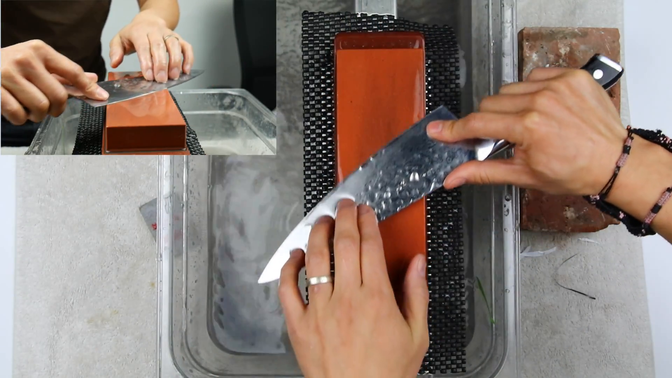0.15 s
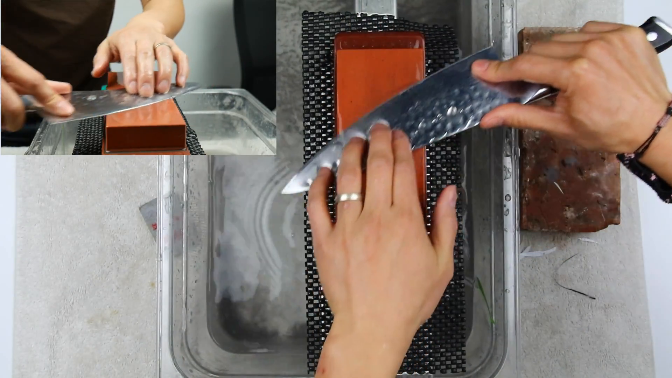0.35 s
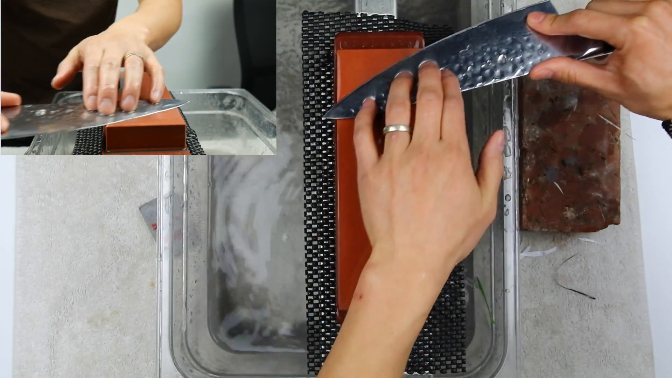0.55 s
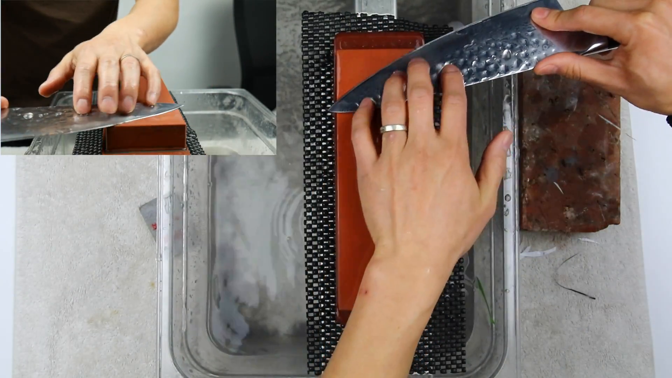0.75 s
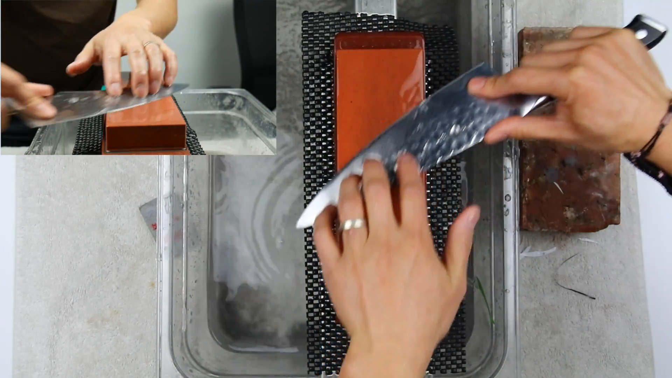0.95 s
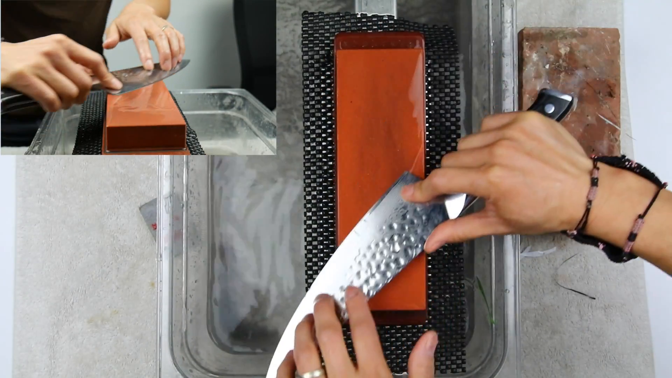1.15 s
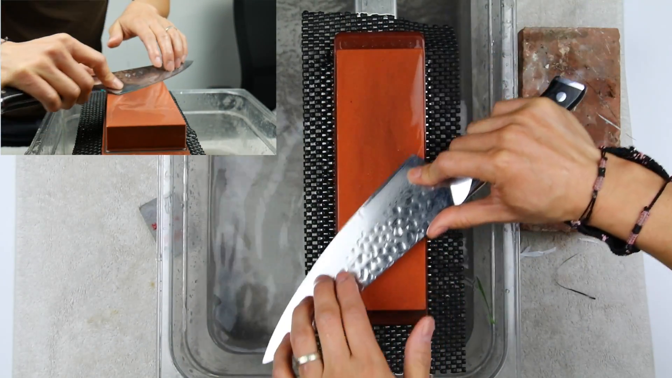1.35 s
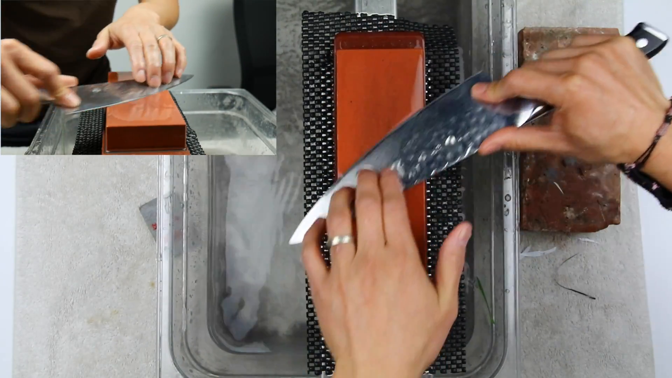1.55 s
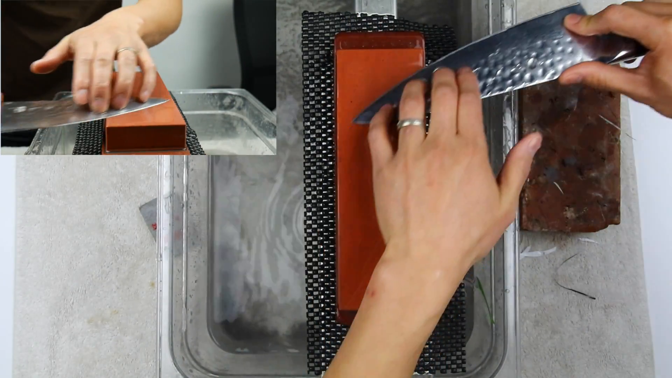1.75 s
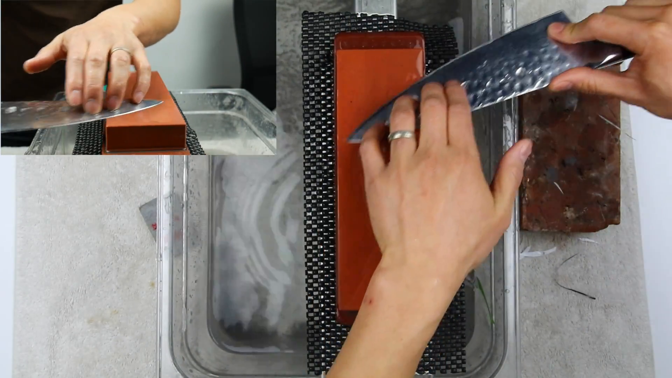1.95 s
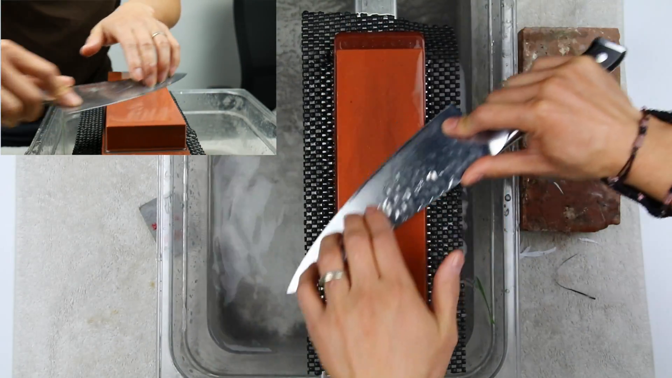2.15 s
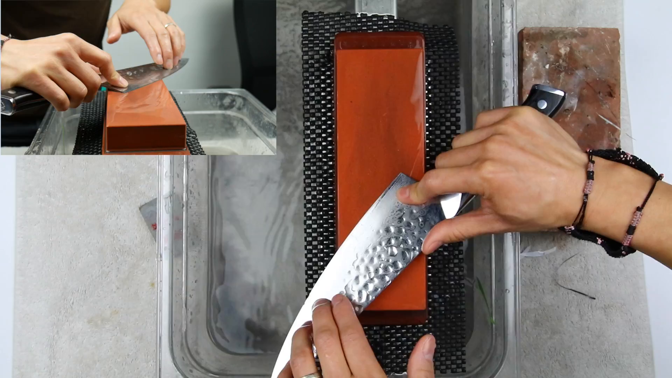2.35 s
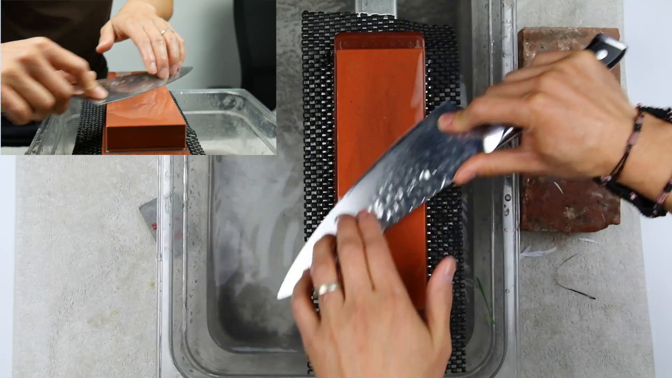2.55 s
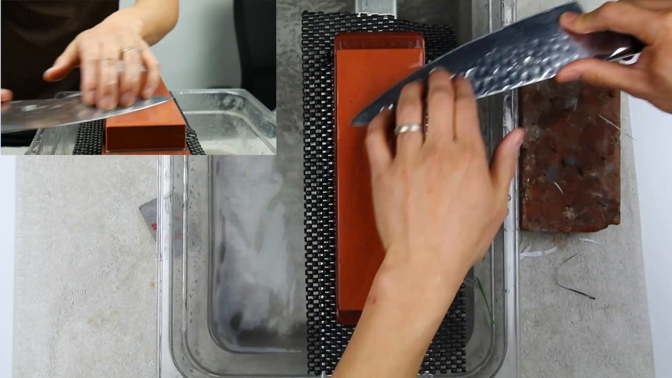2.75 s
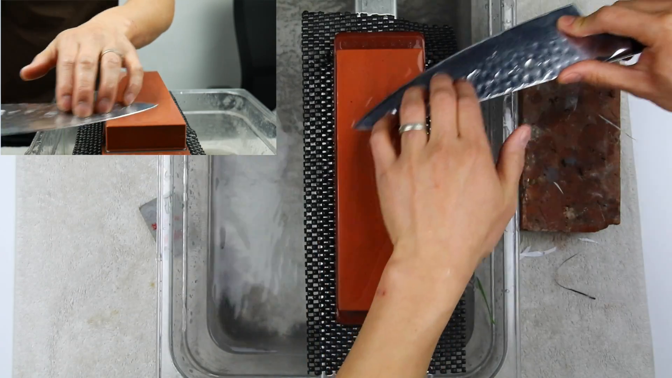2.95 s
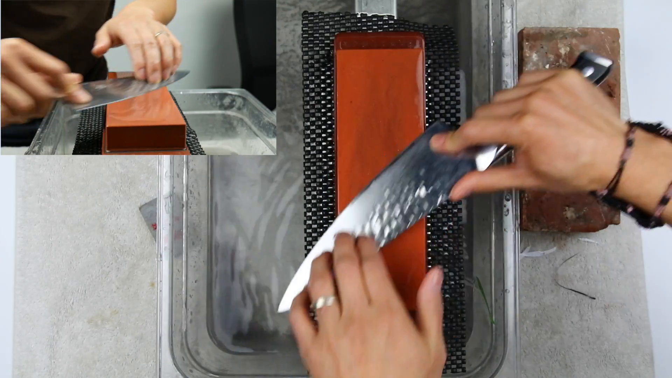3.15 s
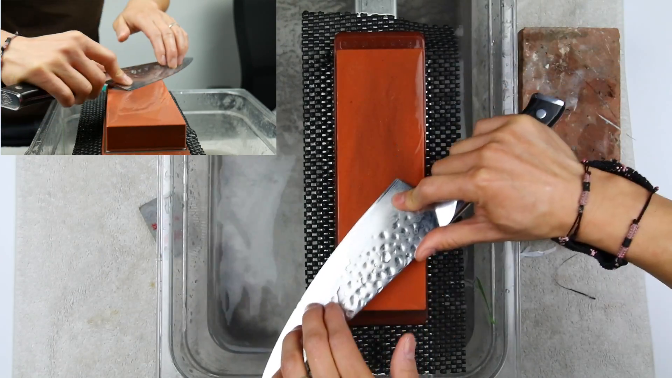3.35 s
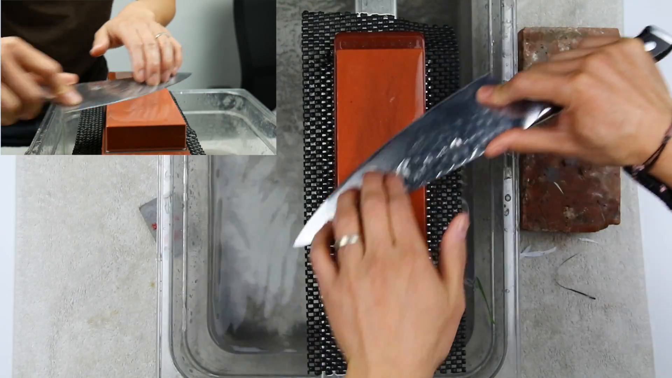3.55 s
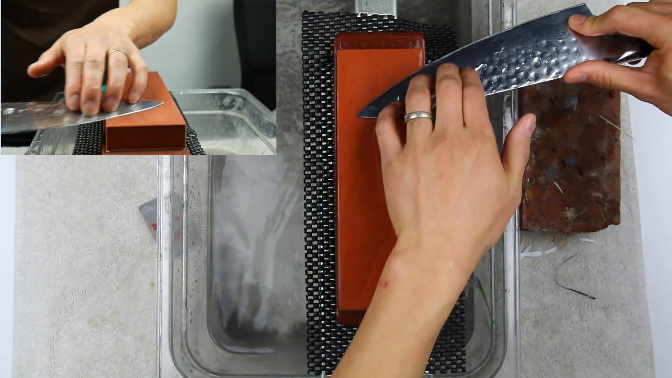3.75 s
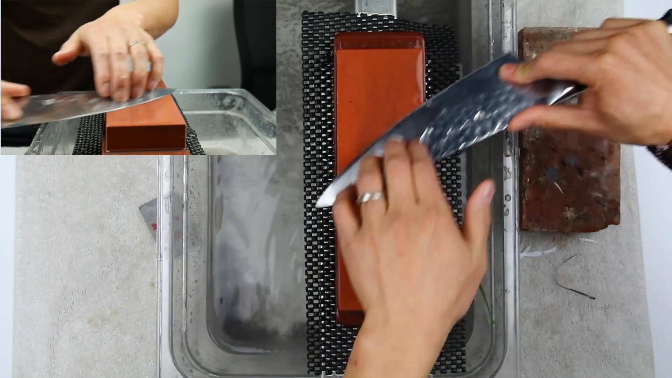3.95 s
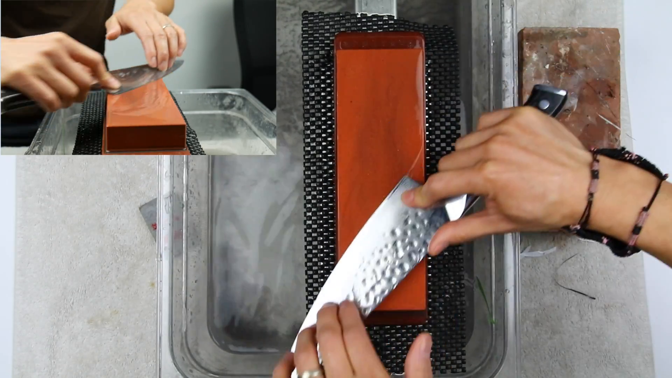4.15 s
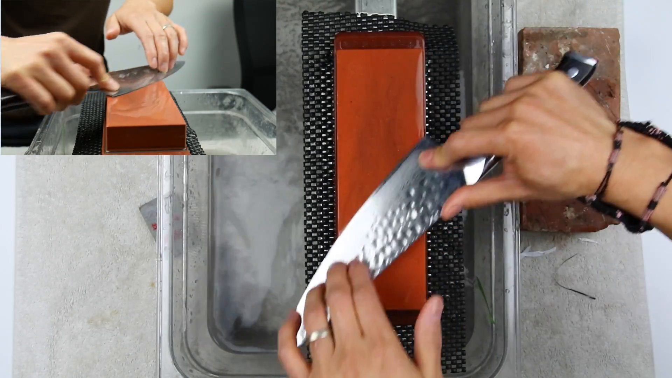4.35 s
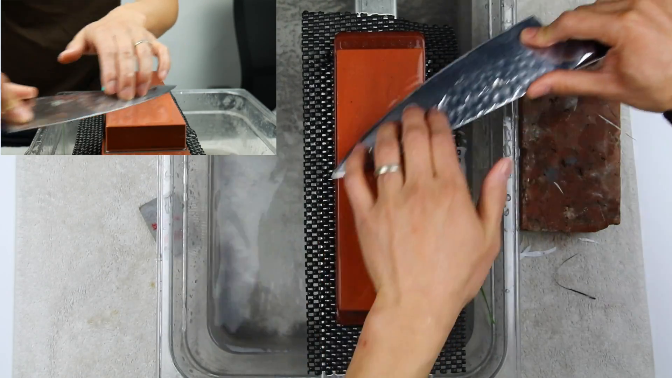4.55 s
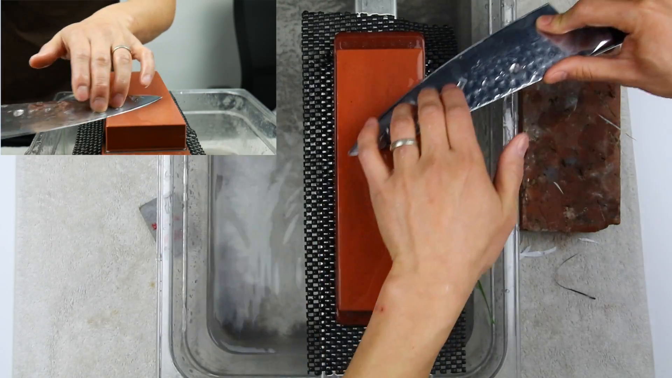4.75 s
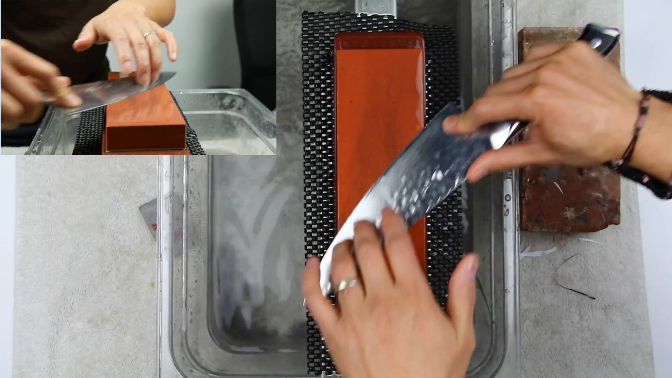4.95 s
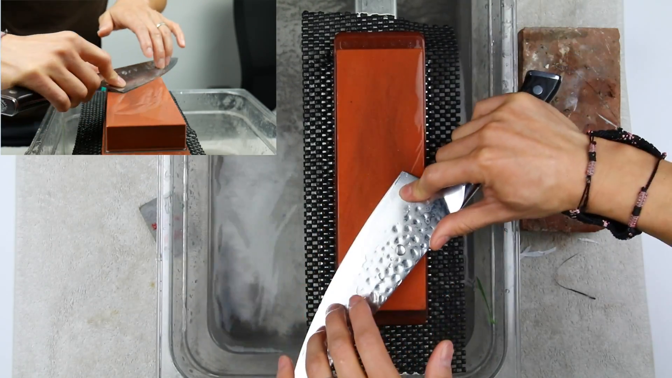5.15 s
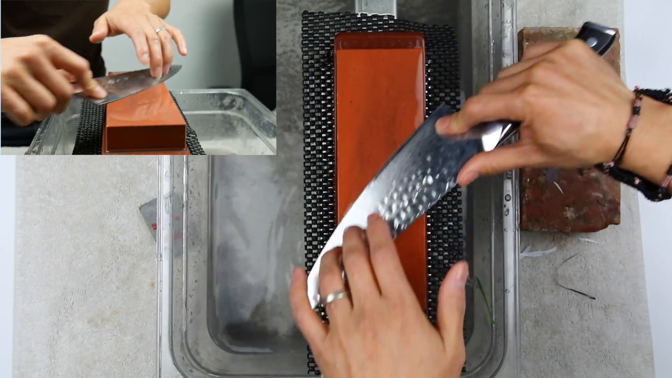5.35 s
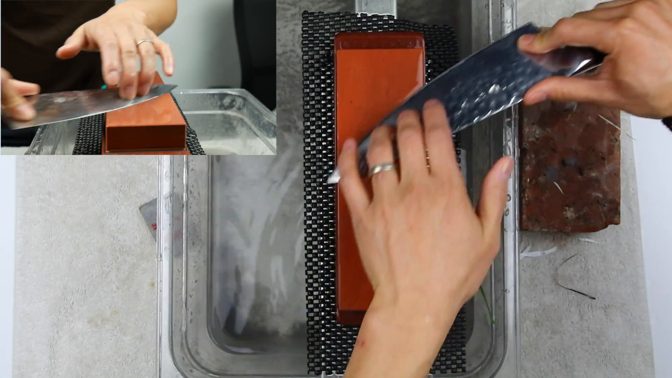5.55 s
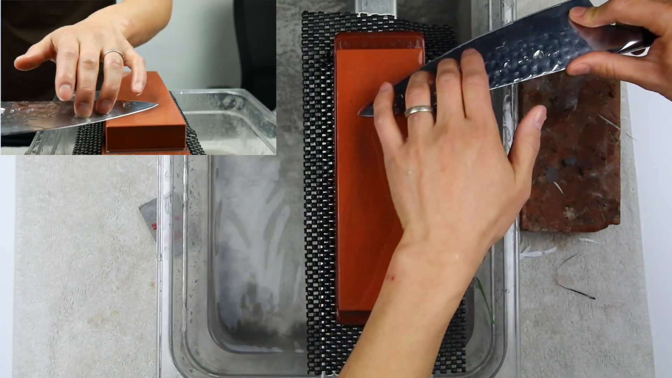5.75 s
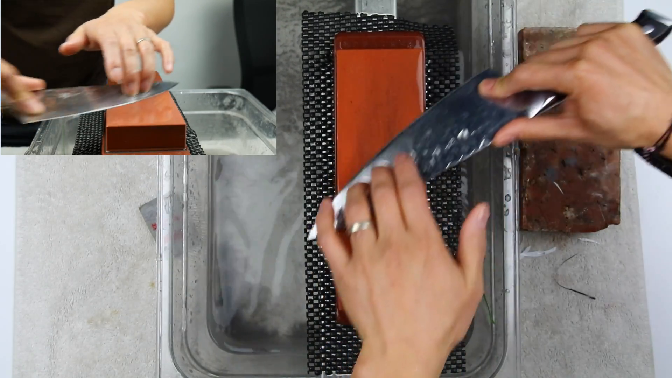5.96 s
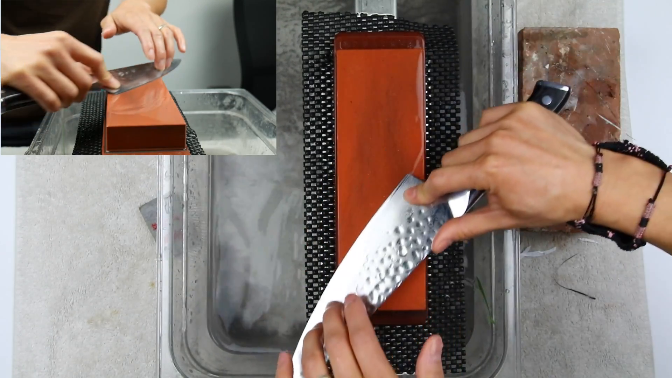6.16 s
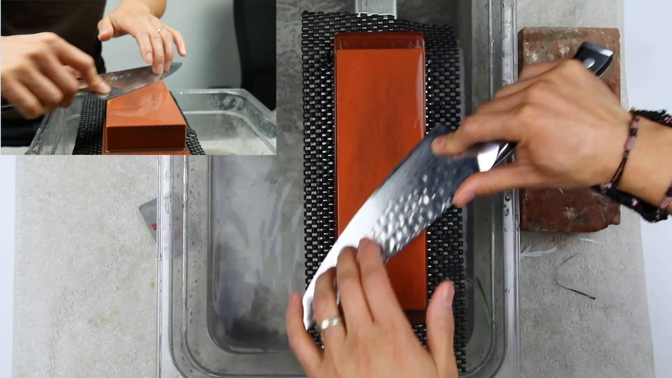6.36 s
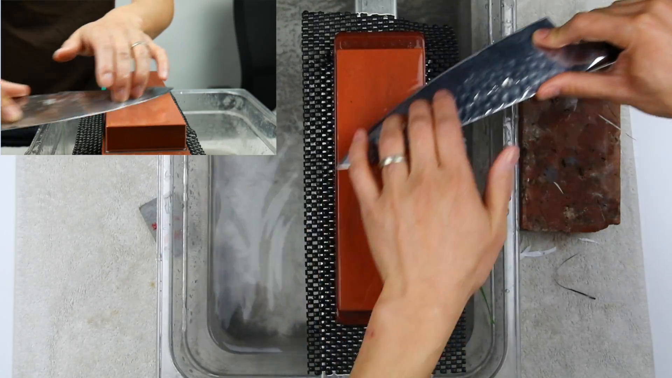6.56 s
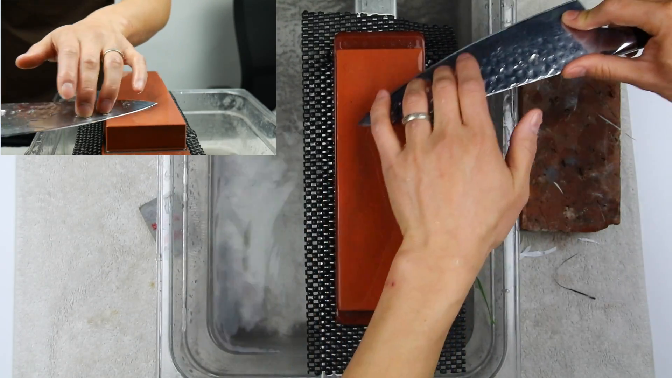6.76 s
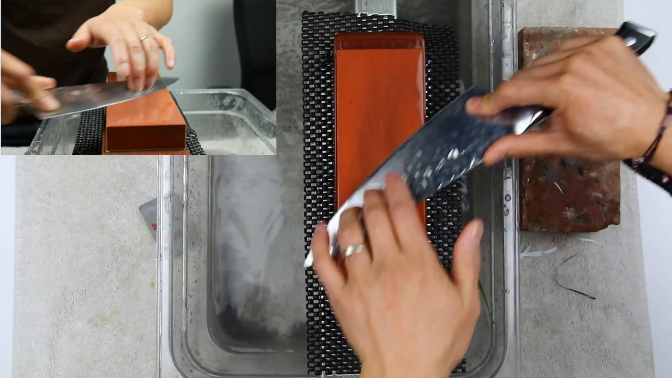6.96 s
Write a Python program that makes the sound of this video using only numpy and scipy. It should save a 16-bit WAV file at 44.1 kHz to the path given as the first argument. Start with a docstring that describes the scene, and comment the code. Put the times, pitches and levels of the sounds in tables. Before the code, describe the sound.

A close microphone in a quiet, faintly humming and rumbling room hears a steel knife worked on a wet whetstone. It opens mid-stroke with a long, rough, bright scrape, with coarse grinding and short high squeaks of the blade until about 0.75 s. After a brief dip, another stroke runs to 1.3 s, with small grit crackles and soft knocks of the stone near 1.1 and 1.25. From then on, pushes and pulls alternate evenly about every half second, each a sandy hiss with thin metallic ringing, pinched off at the turn by a soft, low bench thud. The stone rocks dully around 3.2, 4.0 and 5.0 s. A very faint engine outside grows from about 2 s, strongest near 5.2, then fades. Around 6 s a scrape turns harsher and more hollow. The last stroke, beginning near 6.8 s, is cut off.

```python
"""A steel knife is pushed and pulled over a wet whetstone, two strokes a second, close to a microphone.
From the start a quiet room hums and rumbles, and breaking grit hisses, grinds and rings the blade.
Coarse grains crackle and single resonances sing out; a slow sway of the bench builds up in the first seconds.
From the third stroke on, each turn thuds clearly through the bench, and the stone rocks now and then.
Far outside, an engine grows louder, fades after about five seconds, and the last stroke is cut short."""
import sys
import numpy as np
from scipy import signal
from scipy.fft import rfft, irfft, next_fast_len
from scipy.io import wavfile
from scipy.ndimage import map_coordinates

SR = 44100
rng = np.random.default_rng(int(sys.argv[2]) if len(sys.argv) > 2 else 0)


def dump_mix(stems):
    """Bounce the given channels to the path in sys.argv[1] as a 16-bit WAV at rate SR."""
    frames = np.atleast_2d(stems).T  # one column per channel
    limited = np.clip(frames, -1, 1)  # hard clip at full scale
    pcm = np.round(limited * 32767).astype(np.int16)
    wavfile.write(sys.argv[1], SR, pcm)


N = 308700  # length in samples: 7 s


def amp(db):
    """Turn decibels into a gain."""
    return 10 ** (np.asarray(db) / 20)


def unit(x):
    """Scale x to an average (rms) strength of 1."""
    return x / np.sqrt(np.mean(x ** 2) + 1e-20)


def curve(start_s, value):
    """Join points in time by straight lines, giving one value per sample."""
    return np.interp(np.arange(N) / SR, start_s, value)


def wobble(rate):
    """Draw a smooth random curve through `rate` random points a second."""
    points = rng.standard_normal(int(N * rate / SR) + 4)
    return map_coordinates(points, [np.arange(N) * rate / SR])


def bump(s, half, order=2):
    """A smooth hump of height 1 around s seconds; a higher order flattens its top."""
    return np.exp(-np.abs((np.arange(N) / SR - s) / half) ** order)


def filtered(x, response):
    """Make each frequency of x stronger or weaker by a given response."""
    m = next_fast_len(N + 8192)  # spare room keeps the end from wrapping onto the start
    gain = response(np.fft.rfftfreq(m, 1 / SR))
    return irfft(rfft(x, m) * gain, m)[:N]


def coloured(x, spectrum):
    """Shape x by (hz, level_db) points joined on a log pitch axis, at rms 1."""
    hz, db = np.transpose(spectrum)
    return unit(filtered(x, lambda f: amp(np.interp(np.log(f + 1), np.log(hz), db))))


def resonance(x, hz, width_hz):
    """Keep what one resonance passes: a narrow band around its pitch."""
    return signal.lfilter(*signal.iirpeak(hz, hz / width_hz, SR), x)


def grit(rate, spread_db):
    """Tiny fractures at random moments, about `rate` a second, of widely different sizes."""
    sizes = rng.standard_normal(N) * amp(spread_db * rng.standard_normal(N))
    return unit(sizes * (rng.random(N) < rate / SR))


def add(track, s, sound):
    """Mix a sound into the track at s seconds."""
    part = track[max(round(s * SR), 0):][:len(sound)]
    part += sound[:len(part)]


# steady hum in the room: pitch_hz, level_db
HUM = [(67, -66.5), (334, -88.5), (480, -82.5), (540, -89.5)]
# tone of the room's hiss: pitch_hz, relative_level_db
HISS_TONE = [(290, -17.5), (500, -8.5), (941, -11.5), (1170, -13), (3280, -17), (3960, -16), (15500, -17)]
# tone of the room's rumble: pitch_hz, relative_level_db
RUMBLE_TONE = [(20, -4.5), (30, -0.5), (48, -9.5), (68, -4.5), (88, -9.5), (115, -17), (180, -20),
               (225, -17.5), (280, -21.5), (410, -21), (520, -30), (700, -52), (1500, -58)]
# loudness of the upper rumble, before its trim: start_s, level_db
RUMBLE_LEVEL = [(0.1, -65.5), (0.44, -64.5), (1.47, -72.5), (1.9, -65), (2.68, -70.5), (2.81, -67),
                (4.71, -68.5), (4.74, -65.5), (6.1, -70), (6.85, -67.5)]
RUMBLE_TRIM_DB = 9
DEEP_DB, DEEP_TOP_HZ = -58, 124  # the steady deep part of the rumble
REACH_DB, REACH_HALF_S = 4, 0.043  # swell of the rumble at the far end of each push


def room():
    """Noise makes rumble, its upper part swelling as the arms reach out, and hiss; unsteady tones hum."""
    t = np.arange(N) / SR
    hum = np.zeros(N)
    for hz, db in HUM:
        hum += amp(db) * np.sqrt(2) * np.sin(2 * np.pi * hz * t + 0.63 * wobble(4))
    rumble = coloured(rng.standard_normal(N), RUMBLE_TONE)
    deep = filtered(rumble, lambda hz: 1 / (1 + (hz / DEEP_TOP_HZ) ** 6))
    reach = sum(bump(pull[0], REACH_HALF_S) for pull in STROKES[1::2])  # each pull starts at full reach
    upper_db = curve(*np.transpose(RUMBLE_LEVEL)) + RUMBLE_TRIM_DB
    upper_db += REACH_DB * reach + 0.87 * wobble(11.0)
    hiss = amp(-64.0) * coloured(rng.standard_normal(N), HISS_TONE)
    return hum + amp(DEEP_DB) * deep + amp(upper_db) * (rumble - deep) + hiss


# an engine far outside, before small random wavers: start_s, firing_pitch_hz, level_db
ENGINE = [(0, 144.9, -90), (1.8, 145, -85), (2.402, 160, -76), (2.95, 170, -75.5), (3.198, 141, -77),
          (4.1, 145.4, -74), (4.698, 163, -71.5), (5.2, 169.5, -69), (5.7, 161.3, -77.5)]


def engine():
    """Only the first two harmonics of a distant engine pass the walls."""
    s, hz, db = np.transpose(ENGINE)
    phase = 2 * np.pi * np.cumsum(curve(s, hz) + 1.4 * wobble(12)) / SR
    level = amp(curve(s, db) + 2.1 * wobble(8.9))
    return level * (np.sin(phase) + amp(0.5) * np.sin(2 * phase))


def thuds(events, hz, rise, t60):
    """Soft pushes set a low mode swinging; it dies away by 60 dB in t60 seconds."""
    t, out = np.arange(SR) / SR, np.zeros(N)
    for s, db in events:
        pitch_hz = hz * (1 + 0.019 * rng.standard_normal())
        swing = np.sin(2 * np.pi * pitch_hz * t)
        strength = amp(db - 60 * t / t60) * (1 - np.exp(-(t / rise) ** 2))
        add(out, s, strength * swing)
    return out


# the blade's heel rocks the stone on its mat: start_s, relative_thud_db
ROCKS = [(1.08, -50), (1.26, -51.5), (3.18, -50.5), (4.03, -49.5), (5.0, -48)]
THUD_LEAD_S = 0.016  # the arms brake just before the blade turns
SWAY_DB, SWAY_BUILD_S = -35.5, 1.26  # slow sway of the bench, and the time it takes to build up


def bench():
    """Turns and rocking make low modes thud, and the whole stand sways below hearing."""
    nudges = [(start - THUD_LEAD_S, db) for start, *_, db in STROKES]
    turns = amp(12.5) * thuds(nudges, hz=32.1, rise=0.047, t60=0.76)
    turns += thuds(nudges, hz=66.76, rise=0.04, t60=0.61)
    rocks = amp(2.0) * thuds(ROCKS, hz=81.5, rise=0.013, t60=0.53)
    rocks += amp(-6.0) * thuds(ROCKS, hz=221.0, rise=0.0064, t60=0.17)
    build = 1 - np.exp(-np.arange(N) / SR / SWAY_BUILD_S)
    sway_phase = 2 * np.pi * np.cumsum(7.6 + 0.24 * wobble(0.5)) / SR
    sway = amp(SWAY_DB) * build * np.sqrt(2) * np.sin(sway_phase)
    return turns + rocks + sway


# one resonance briefly sings out under the stroke: middle_s, pitch_hz, relative_level_db, half_length_s
SINGS = [(0.126, 6560, -44, 0.022), (0.115, 3180, -47, 0.038), (0.187, 3080, -50.5, .036),
         (0.282, 6500, -42.5, 0.06), (0.273, 1310, -62, .08), (0.403, 6930, -45, .03),
         (0.503, 7490, -39.5, 0.021), (1.03, 1000, -62.5, .04), (1.42, 6700, -53.5, .06),
         (1.744, 9200, -46.5, 0.037), (2.56, 10550, -47, .04), (2.567, 4400, -58, .03),
         (3.165, 1010, -64, 0.027), (3.374, 1060, -56, 0.0072), (3.71, 4720, -53, 0.012),
         (5.986, 1890, -60, 0.045), (6.009, 1100, -56, 0.011), (5.56, 1580, -69, .05),
         (6.11, 1575, -64, .08), (6.5, 1580, -69.5, 0.088), (6.732, 6140, -53.5, 0.033)]


def singing(waver_hz=45):
    """Friction locks onto one resonance for a moment, with unsteady pitch and strength."""
    out = np.zeros(N)
    drift = np.cumsum(waver_hz * wobble(160)) / SR  # in turns of the wave
    flutter = unit(amp(2.9 * wobble(140)))
    for s, hz, db, half in SINGS:
        first = max(int((s - 3 * half) * SR), 0)
        last = min(int((s + 3 * half) * SR), N)
        i = np.arange(first, last)
        swell = np.exp(-((i / SR - s) / half) ** 2)
        tone = np.sin(2 * np.pi * (hz * i / SR + drift[i]))
        out[i] += amp(db) * swell * flutter[i] * tone
    return amp(-0.5) * out


# the edge catches on a coarse grain: start_s, relative_level_db, brightest_hz
CATCHES = [(0.1244, -21, 8800), (0.459, -25, 6770), (0.5028, -19, 7540), (1.0544, -24, 9650),
           (1.2266, -26, 8000), (1.4317, -25, 10700), (2.7097, -26, 8600), (4.1922, -20, 7430),
           (4.226, -23, 6800), (5.0904, -28.5, 9190), (5.342, -25, 6200), (5.4407, -27, 8600),
           (5.641, -27.5, 8860), (6.346, -31, 6890), (6.6423, -27, 8950)]


def catches(attack=0.00081, t60=0.024, width_hz=1800):
    """A coarse grain crumbles in a short burst, brightest around one pitch of the blade."""
    t, out = np.arange(SR // 8) / SR, np.zeros(N)
    crumbs = coloured(grit(rate=20000, spread_db=-3), FINE_TONE)
    for s, db, hz in CATCHES:
        burst = crumbs[round(s * SR):][:len(t)]
        ring = unit(resonance(burst, hz, width_hz))
        strength = amp(db - 11.0 - 60 * t / t60) * (1 - np.exp(-t / attack))
        add(out, s, strength * unit(ring + amp(-5) * burst))
    return out


def crunch(rate, life, size):
    """Clumps of slurry give way suddenly, then crumble for a few milliseconds."""
    breaks = (rng.random(N) < rate / SR) * rng.uniform(0.21, 1, N)
    return 1 + size * signal.lfilter([1], [1, -np.exp(-1 / (life * SR))], breaks)


def ringing(x, modes, wander_db, wander_rate):
    """x through resonances, each fed more or less as the contact slides over its nodes."""
    out = np.zeros(N)
    for hz, width_hz, db in modes:
        out += resonance(x, hz, width_hz) * amp(db + wander_db * wobble(wander_rate))
    return unit(out)


def patches(shape, width_hz, rate):
    """A smooth random field over frequency and time."""
    hz = np.linspace(0, SR / 2 / width_hz, shape[0])
    s = np.linspace(0, N / SR * rate, shape[1])
    knots = rng.standard_normal((int(hz[-1]) + 2, int(s[-1]) + 2))
    return unit(map_coordinates(knots, np.meshgrid(hz, s, indexing="ij"), order=2))


def shifting(x, lines_db, flicker_db, broad_db):
    """The blade's many close resonances come and go with the place of contact."""
    z = signal.stft(x, nperseg=1024)[2]
    lines = lines_db * patches(z.shape, width_hz=105, rate=9)
    flicker = flicker_db * patches(z.shape, width_hz=210, rate=38)
    broad = broad_db * patches(z.shape, width_hz=520, rate=9)
    hz = np.linspace(0, SR / 2, len(z))[:, None]
    depth = np.interp(hz, [9000, 15000], [1, .7])  # resonances overlap more in the top treble
    gain = amp(depth * (lines + flicker + broad))
    gain /= np.sqrt(np.mean(gain ** 2, axis=1, keepdims=True))  # rms gain 1 at every pitch
    return signal.istft(z * gain, nperseg=1024)[1][:N]


# strokes, pushing away and pulling back in turn, each lasting until the next begins:
# start_s, speed_up_s, slow_down_s, then relative levels fine_db, coarse_db, hollow_db, bench_thud_db
STROKES = [ (-0.03, 0.01, .14, -49.5, -58.5, -68.5, -74), (0.785, 0.052, 0.093, -48, -58.5, -69, -66),
           (1.31, .06, .05, -47, -61, -72.5, -48), (1.914, 0.045, 0.053, -48.5, -62, -73.5, -49),
           (2.418, 0.08, 0.026, -49, -62.5, -75.5, -48), (2.937, 0.022, 0.033, -50.5, -62.5, -73, -46),
           (3.378, .04, 0.03, -51, -63.5, -72.5, -44.5), (3.85, 0.04, 0.023, -51, -66.5, -77, -50.5),
           (4.293, 0.034, 0.026, -50, -62.5, -77.5, -46), (4.759, 0.017, 0.04, -50, -63.5, -77, -50.5),
           (5.216, 0.055, 0.047, -49.5, -61, -71.5, -43), (5.812, 0.039, 0.022, -48.5, -63, -74, -49.5),
           (6.274, 0.022, 0.022, -50.5, -63.5, -74, -44.5), (6.775, 0.029, .04, -51, -63.5, -69.5, -52)]
# the fingers bear down, or lift where negative:
# middle_s, length_s, added_fine_db, added_coarse_db, added_hollow_db
LEANS = [(0.224, 0.59, 4.5, 11, -3), (0.13, 0.32, 0.5, -0.5, 5.5), (0.763, 0.096, -19, -6, -1),
         (0.908, 0.11, 5.5, 0, 0), (1.073, 0.038, 3.5, 3, 5), (1.156, 0.031, 1, 3, 1),
         (1.206, 0.037, -6.5, -10, -7), (1.243, 0.049, 4.5, 12, 7), (1.393, 0.17, -6, 2.5, -5),
         (1.52, .05, 1.5, 5, -7), (2.033, .05, -0.5, -2, 7), (2.217, .07, 1.5, -1, 2),
         (2.564, 0.12, 1, 4, -3), (2.66, 0.055, 2.5, -13, 0), (3.196, 0.077, 1.5, 1.5, 5),
         (3.704, 0.023, 4.5, 2, 1), (3.776, 0.045, 3, -9, -11), (4.08, 0.13, 4, 6.5, 10.5),
         (4.242, 0.096, 0, 11.5, 4.5), (4.705, 0.041, 5.5, 2, -8), (5.05, 0.16, 0.5, 3, -4),
         (5.309, 0.16, 2.5, 3.5, -4), (5.496, 0.039, -1, -6, -4), (5.566, 0.069, 0.5, 1.5, 1.5),
         (5.99, 0.15, 6.5, 12, 13.5), (6.122, 0.12, -2, 5, 9.5), (6.214, 0.077, -4.5, -1, -3),
         (6.555, 0.086, 1, 4, 8), (6.729, 0.035, 4, 5.5, -6), (6.833, 0.052, 4, 3, -11)]
# the hands ease off once in every stroke: (after_turn_s, half_length_s, depth_db)
PUSH_EASE, PULL_EASE = (0.24, 0.17, 1), (0.17, 0.096, 3)
TREMOR_DB, TREMOR_RATE = 0.98, 24  # unsteadiness of the hands, and its changes a second
TAP_DB, TAP_HALF_S, TAP_LEAD_S = -69.5, 0.012, 0.0055  # the bevel rocks over just before each turn
LAST_STROKE_S = .48
CREEP_DB = -26  # the blade never quite stands still at a turn


def stroke_gains():
    """Fine, coarse and hollow scraping follow the blade's speed and the force of the hands."""
    t, gains = np.arange(N) / SR, np.zeros((3, N))
    ends = [row[0] for row in STROKES[1:]] + [STROKES[-1][0] + LAST_STROKE_S]

    def ramp(since, time):
        """Rise smoothly from 0 towards 1."""
        return np.tanh((np.maximum(since, 0) / time) ** 1.73)

    for k, (start, rise, fall, *layers_db, _) in enumerate(STROKES):
        after, half, depth_db = (PUSH_EASE, PULL_EASE)[k % 2]
        speed = ramp(t - start, rise) * ramp(ends[k] - t, fall)
        speed += amp(CREEP_DB) * (t >= start) * (t < ends[k])
        force = amp(-depth_db * bump(start + after, half))
        gains += np.outer(amp(layers_db), speed * force)
    lean_db = np.zeros((3, N))
    for s, length, *added_db in LEANS:
        lean_db += np.outer(added_db, bump(s, length / 2, order=4))
    fine, coarse, hollow = gains * amp(lean_db + TREMOR_DB * wobble(TREMOR_RATE))
    taps = amp(TAP_DB) * sum(bump(end - TAP_LEAD_S, TAP_HALF_S) for end in ends)
    return fine, coarse, hollow + taps


# tone of fine hiss, coarse grinding and hollow scraping: pitch_hz, relative_level_db
FINE_TONE = [(1500, -40), (3400, -56), (5000, -15), (6200, -2.5), (7200, -0.5), (9500, 1.5), (11000, 1.5),
             (12500, -1), (15800, -3)]
COARSE_TONE = [(800, -34), (2300, -12.5), (3400, -6), (4500, -4), (5800, -0.5), (7000, -4.5), (9000, -9),
               (15000, -33)]
HOLLOW_TONE = [(400, -4), (800, -13.5), (1100, 2), (2300, -4), (3000, 1.5), (5000, -59)]
# resonances of the held blade, heard with the fine hiss and with the coarse grinding,
# and of blade and stone pressed together: pitch_hz, width_hz, relative_level_db
BLADE_FINE = [(4090, 146, 1), (6800, 200, 4), (7290, 310, 1), (8300, 510, -8), (9250, 110, -15),
              (10320, 200, -2)]
BLADE_COARSE = [(2907, 120, -4.5), (3170, 37, -14), (3607, 130, 0), (3980, 350, 0.5), (4550, 84, 9.5),
                (4950, 230, -1)]
STONE = [(1090, 47, 4), (1270, 120, -5), (1602, 97, 1.5), (1780, 130, -3.5), (2120, 98, -2),
         (2580, 210, -5.5)]


def rasp():
    """One stream of breaking grit excites fine hiss, coarse grinding and the hollow of the stone."""
    judder = amp(0.58 * wobble(400)) * crunch(rate=78, life=0.0049, size=.65)
    grains = judder * grit(rate=24000, spread_db=0.5)
    fine = coloured(grains, FINE_TONE)
    fine += amp(-15) * ringing(grains, BLADE_FINE, wander_db=4.0, wander_rate=12)
    coarse = coloured(grains, COARSE_TONE)
    coarse += amp(-8.0) * ringing(grains, BLADE_COARSE, wander_db=1.0, wander_rate=7.1)
    hollow = coloured(grains, HOLLOW_TONE)
    hollow += amp(3.5) * ringing(grains, STONE, wander_db=2, wander_rate=12)
    scrape = np.zeros(N)
    for gain, layer in zip(stroke_gains(), (fine, coarse, hollow)):
        scrape += gain * unit(layer)
    return shifting(scrape, lines_db=2.6, flicker_db=2.3, broad_db=1.1)


def scene():
    """Room, engine, bench and knife add up at one microphone."""
    return (room() + engine() + bench() + singing() + catches() + rasp())[None]


def record(dry, top_hz=15800):
    """Nothing above the top frequency passes."""
    return np.array([filtered(channel, lambda hz: hz < top_hz) for channel in dry])


dry = scene()
out = record(dry)
dump_mix(out)
```